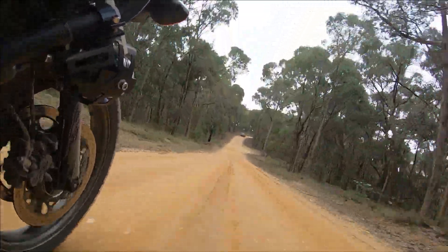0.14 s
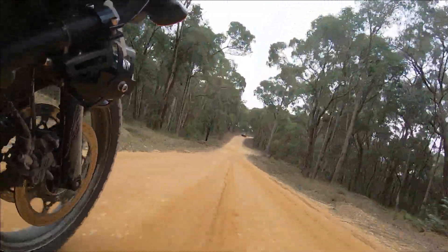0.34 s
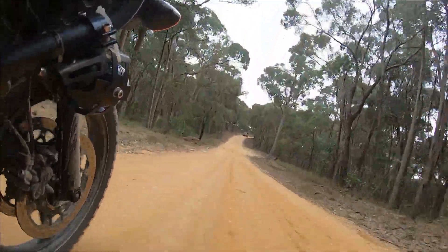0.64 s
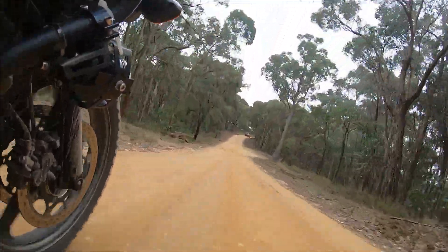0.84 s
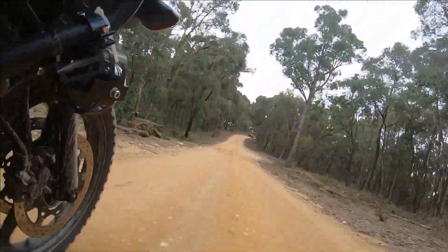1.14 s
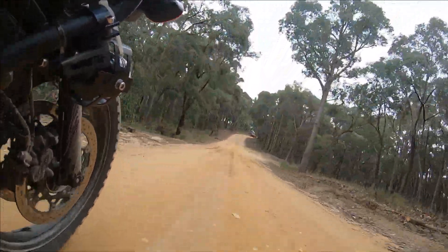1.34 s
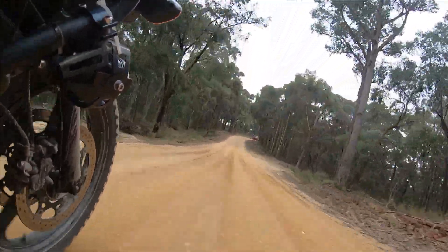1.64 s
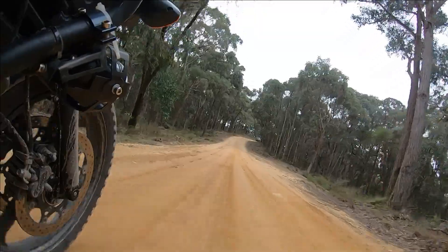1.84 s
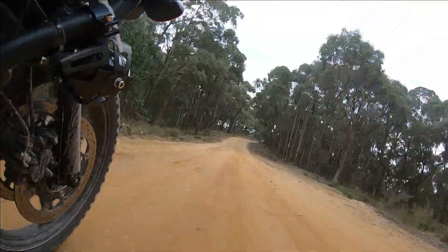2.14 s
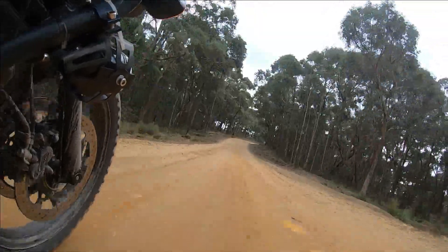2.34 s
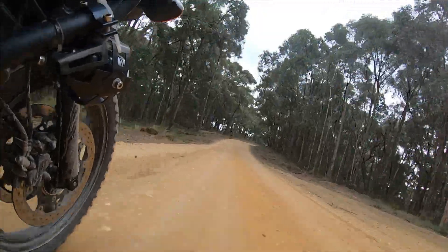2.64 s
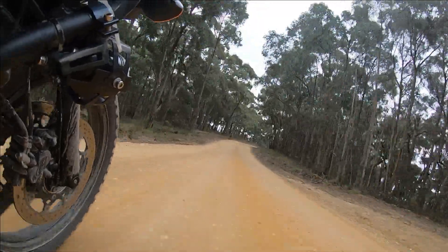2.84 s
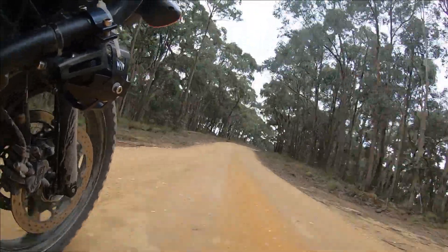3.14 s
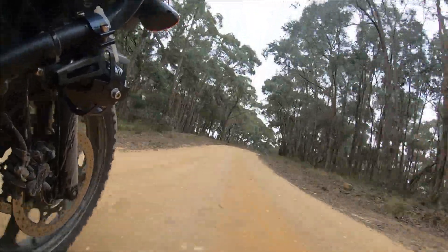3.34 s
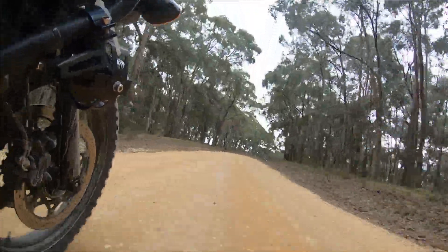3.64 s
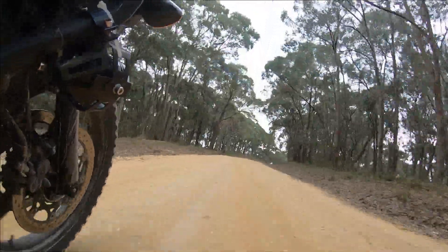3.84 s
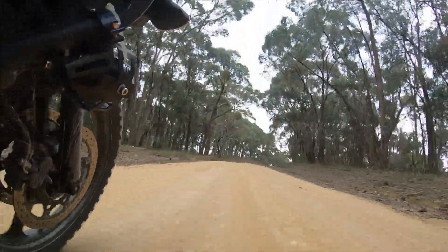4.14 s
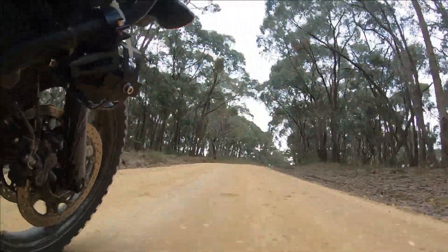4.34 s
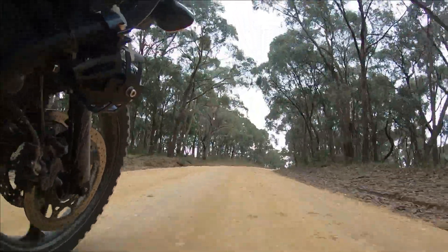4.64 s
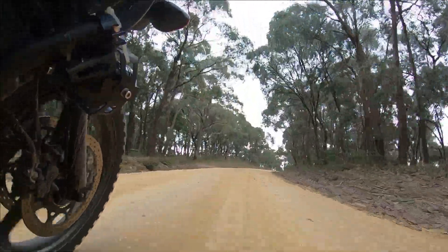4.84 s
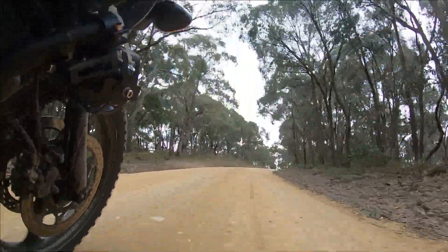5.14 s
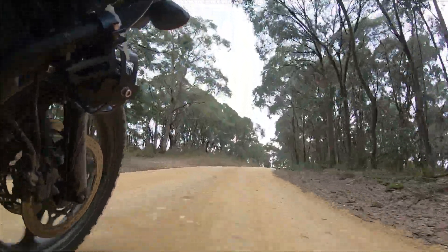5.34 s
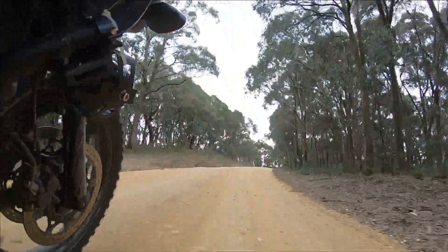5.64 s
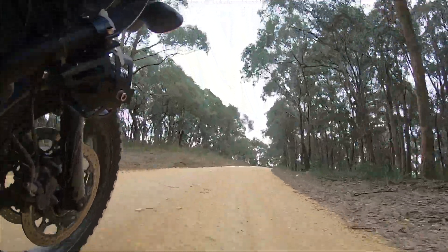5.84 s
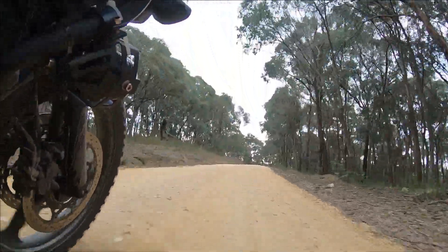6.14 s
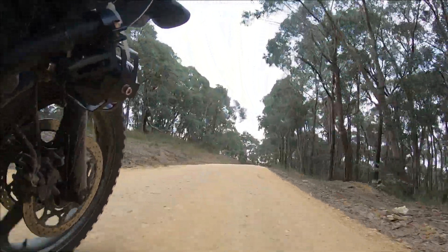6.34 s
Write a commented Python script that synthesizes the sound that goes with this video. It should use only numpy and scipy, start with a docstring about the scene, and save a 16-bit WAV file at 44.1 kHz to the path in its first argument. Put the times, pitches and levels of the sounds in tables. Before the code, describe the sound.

Low wind rumble and gritty tyre hiss surround a motorcycle coasting on a dirt road, with the microphone near the front wheel. Its twin-cylinder drone and gear whine slide down in pitch for about five seconds over a mechanical rattle. One flung stone clicks on metal. Near the end the engine takes up load again, growling and knocking at low, fairly steady revs.

```python
"""Gravel road, low beside the front wheel of a rolling twin-cylinder motorcycle.
Wind buffets the microphone, the tyre hisses over grit, and one stone ticks against a guard.
Valves and chain clatter, gears whine through the case resonances, uneven firings drive the exhaust.
The revs sink on a closed throttle; from about 5.3 s the engine pulls again."""
import sys
import numpy as np
from scipy import signal
from scipy.fft import rfft, irfft, next_fast_len
from scipy.io import wavfile
from scipy.ndimage import uniform_filter1d, minimum_filter1d, map_coordinates

SR = 44100
rng = np.random.default_rng(int(sys.argv[2]) if len(sys.argv) > 2 else 0)


def to_wav(sig):
    """Store sig (one row per channel, or 1-D mono) as 16-bit WAV at the path in sys.argv[1].

    Samples outside -1..1 are clipped; the rate is SR.
    """
    pcm = np.clip(np.atleast_2d(sig), -1, 1) * 32767
    pcm = np.round(pcm).astype(np.int16)
    wavfile.write(sys.argv[1], SR, pcm.T)  # frames by channels


N = 286650

FIRING_CYCLES = (0, 3 / 8)
CRUISE_HZ, STRAIN_S = 40, 0.55
SILENCER_HZ, SILENCER_WIDTH_HZ = 161.5, 36
# gain laws: level/dB at CRUISE_HZ, dB per doubling of revs, dB added at full strain
WIND_LAW_DB, TYRE_LAW_DB, AIR_LAW_DB = (-18.5, 2.9, 1.5), (-38.5, 8, 6.4), (-69, 3, .8)
HEAD_LAW_DB, BARK_LAW_DB = (-29.5, 11.8, 8.4), (-27, 11.4, 3.5)

# four-stroke cycle rate: t/s, f/Hz
CYCLE_RATE = [(0.0, 49.1), (0.09, 48.3), (0.9, 46.6), (1.01, 47.0), (1.23, 45.5), (1.61, 45.6), (1.9, 44.0),
              (2.37, 43.4), (3.08, 41.0), (3.35, 39.5), (3.49, 39.3), (3.87, 38.0), (5.23, 32.4),
              (5.36, 33.8), (5.47, 32.5), (5.72, 33.0), (5.99, 32.7), (6.5, 33.4)]
# engine load: t/s, load (-1 braking, 0 slack, 1 pulling, more as the throttle snaps open)
ENGINE_LOAD = [(0, -.9), (4.95, -1), (5.14, 0), (5.33, 0), (5.37, 2.1), (5.41, 1.8), (5.46, .9), (6.5, 1)]
# spectral shapes: f/Hz, relative level/dB
WIND_SHAPE = [(10, -11.5), (25, -10), (36, -9), (52, 1.5), (70, -4), (110, -6.5), (200, -15.5), (400, -23),
              (900, -43)]
TYRE_SHAPE = [(2120, -28), (3600, -4), (4090, -0.5), (4460, 2.5), (4790, -0.5), (5040, 0.5), (5560, -8),
              (7850, -13), (9270, -24), (12100, -45.5), (20400, -120)]
AIR_SHAPE = [(8000, -14.5), (10000, -11.5), (11500, 4.5), (12400, 0), (13500, -17), (15000, -17)]
CRACK_SHAPE = [(1500, -17), (3000, 4), (5000, 5), (8000, 3), (9300, -23), (10000, -32), (15000, -38)]
CRANKCASE_SHAPE = [(320, -36.5), (550, -8.5), (807, -3), (929, 1), (1090, -2.5), (1190, -0.5), (1380, -3.5),
                   (1540, -2), (1900, -16.5), (2470, -19.5), (4180, -120)]
HEAD_SHAPE = [(1060, -36), (1800, -0.5), (3270, -6.5), (3900, -16), (5070, -43), (8580, -120)]
AIRBOX_SHAPE = [(90, -32), (135, 5), (165, 6.5), (228, 4.5), (265, -9), (360, -19), (500, -33)]
PIPE_SHAPE = [(110, -38.5), (170, 1.5), (240, -2.5), (320, 2), (420, -2), (600, -3), (800, -9), (1300, -24)]
BOOM_SHAPE = [(66, -7.5), (82, -6.5), (96, -2.5), (115, 0.5), (130, 0), (141, -5.5), (158, -8), (175, -2.5),
              (212, -2.5), (255, -13.5), (290, -11)]
# stone strike: t/s, gain/dB
STONE_HITS = [(4.7330, -12.5)]
# guard modes: f/Hz, relative level/dB, t60/s
GUARD_MODES = [(3000, -1.5, 0.016), (3660, 1, 0.0099), (5500, -12, .005), (7470, -1, 0.0064),
               (8100, -14, 0.0046)]
# crankcase clatter envelope: t/s, level/dB
CLATTER_ENVELOPE = [(0.0, -20.5), (1.2, -21.5), (1.5, -20), (2.0, -24.5), (2.4, -20.5), (3.35, -24.8),
                    (3.65, -22), (4.4, -26.5), (5.2, -25.5), (5.6, -24), (6.0, -23.5), (6.5, -21.5)]
# resonances of the loaded engine metal and of the cases: f/Hz, width/Hz, relative level/dB
KNOCK_MODES = [(920, 380, 4.5), (2270, 260, 2), (3244, 1060, -4), (4730, 120, -11), (5140, 110, -5.5)]
CASE_MODES = [(252, 51, -29), (338, 60, -35.5), (477, 45, -42.5), (588, 22, -38.5), (751, 64, -28.5),
              (940, 92, -36), (1180, 65, -39.5), (1582, 180, -32.5), (2124, 140, -34.5)]
# gear and chain tones: order (multiple of the cycle rate), relative level/dB
COAST_ORDERS = [(7, 0.5), (8, -3.5), (9, -6.5), (10, -2), (12, -0.5), (13, 4), (14, -3), (16, -1), (23, 2),
                (28, 1.5), (34, 1), (35, 0), (36, 1), (39, -2), (41, -1.5), (58, -1.5)]
DRIVE_ORDERS = [(7, -3.5), (11, -2.5), (20, 2), (22, -4.5), (28, 0), (35, 0), (48, -3.5), (65, -4),
                (68, -1)]
# strong exhaust tones ahead of BOOM_SHAPE: order, braking level/dB, slack level/dB, pulling level/dB
BOOM_ORDERS = [(2, -15.5, -13.5, -18), (3, -14.5, -16.5, -19.5), (4, -22, -27, -27), (5, -35.5, -28, -27),
               (6, -20.5, -29.5, -17.5)]


def amp(db):
    """Decibels to gain."""
    return 10 ** (np.asarray(db) / 20)


def unit(x):
    """Scale to rms 1."""
    return x / np.sqrt(np.mean(x ** 2) + 1e-20)


def curve(rows):
    """(t/s, value) rows interpolated per sample."""
    return np.interp(np.arange(N) / SR, *np.transpose(rows))


def wobble(rate_hz):
    """Smooth random curve, rate_hz knots a second."""
    return map_coordinates(rng.standard_normal(8192), [np.arange(N) * rate_hz / SR + 2], mode="wrap")


def coloured(x, shape, size=16384):
    """x through a minimum-phase filter of (f/Hz, level/dB) shape, at rms 1."""
    hz, db = np.transpose(shape)
    bins_hz = np.fft.rfftfreq(size, 1 / SR)
    gain = amp(np.interp(np.log(bins_hz + 1), np.log(hz), db, right=-100))
    cepstrum = irfft(np.log(np.maximum(gain, 1e-6)))
    cepstrum[1:size // 2] *= 2
    cepstrum[size // 2 + 1:] = 0
    impulse_response = irfft(np.exp(rfft(cepstrum)))
    return unit(signal.fftconvolve(x, impulse_response)[:N])


def resonant(x, modes):
    """x through resonances of heavy metal that passes no top treble, at rms 1."""
    size = next_fast_len(N + SR // 4)
    f = np.fft.rfftfreq(size, 1 / SR)
    rings = sum(amp(db) * (1j * f * width_hz / (hz * hz - f * f + 1j * f * width_hz)) ** 2
                for hz, width_hz, db in modes)
    response = rings / (1 + (f / 7500) ** 10)
    return unit(irfft(rfft(x, size) * response, size)[:N])


def pulses(cycle, at_cycles, scatter_db, jitter_s):
    """Uneven impulses at given points of every engine cycle."""
    marks = (np.arange(int(cycle[-1]) + 1)[:, None] + np.asarray(at_cycles)).ravel()
    timing, size = rng.standard_normal((8192, 2))[:len(marks)].T
    at_samples = np.interp(marks, cycle, np.arange(N), right=2 * N) + jitter_s * SR * timing
    return unit(np.bincount(np.abs(at_samples).astype(int), amp(scatter_db * size), minlength=N)[:N])


def puffs(cycle, at_cycles, sharpness):
    """Noise swelling at given points of every engine cycle."""
    gate = sum(np.exp(sharpness * (np.cos(2 * np.pi * (cycle - at)) - 1)) for at in at_cycles)
    return unit(gate * rng.standard_normal(N))


def hiss(patchy_db):
    """Noise with drifting patches of gain."""
    spectra = signal.stft(rng.standard_normal(N), nperseg=1024)[2]
    patches = uniform_filter1d(rng.standard_normal(spectra.shape), size=5, axis=0)
    patches = uniform_filter1d(patches, size=12, axis=1)
    return unit(signal.istft(spectra * amp(patchy_db * unit(patches)), nperseg=1024)[1][:N])


def loudness(law_db, pull):
    """Gain rising with revs and with the strain that builds as the engine pulls."""
    cruise_db, revs_db, strain_db = law_db
    pole = np.exp(-1 / (STRAIN_S * SR))
    strain = signal.lfilter([1 - pole], [1, -pole], pull)
    return amp(cruise_db + revs_db * np.log2(curve(CYCLE_RATE) / CRUISE_HZ) + strain_db * strain)


def wind(pull):
    """Eddies thump on the microphone, gusting at random."""
    gust_db = 0.6 * wobble(rate_hz=4)
    return loudness(WIND_LAW_DB, pull) * amp(gust_db) * coloured(rng.standard_normal(N), WIND_SHAPE)


def tyre(cycle, pull):
    """Tread hisses over grit, with thin metal rings; a faint airy hiss grows under load."""
    surface_db = 0.39 * wobble(24)
    grit = unit((rng.random(N) < 500 / SR) * rng.standard_normal(N))  # 500 grains/s
    tread = hiss(patchy_db=1.3) + .35 * grit + .3 * puffs(cycle, FIRING_CYCLES, sharpness=11)
    rush = amp(0.6) * coloured(tread, TYRE_SHAPE)
    ring = amp(-11.5) * resonant(rng.standard_normal(N), [(4680, 120, 2.2), (6300, 48, -1.7)])
    air_gain = loudness(AIR_LAW_DB, pull) * amp(3.3 * np.minimum(pull, 1) + 1.5 * surface_db)
    air = air_gain * coloured(hiss(patchy_db=1.0) + .3 * grit, AIR_SHAPE)
    return loudness(TYRE_LAW_DB, pull) * amp(surface_db) * (rush + ring) + air


def stone():
    """A flung stone cracks against a guard, which rings for milliseconds."""
    out, t = np.zeros(N + SR), np.arange(SR // 20) / SR
    attack = 1 - np.exp(-(t / .00025) ** 2)
    ring = sum(amp(db - 60 * t / t60_s) * np.sin(2 * np.pi * hz * t) for hz, db, t60_s in GUARD_MODES)
    for start_s, gain_db in STONE_HITS:
        noise = coloured(rng.standard_normal(N), CRACK_SHAPE)[SR:][:len(t)]
        crack = 0.62 * amp(-60 * t / 0.01) * noise
        out[round(start_s * SR):][:len(t)] += amp(gain_db) * (ring + crack) * attack
    return out[:N]


def clatter(cycle, pull):
    """Valves and chain rattle cases and heads at 8 points a cycle; the metal knocks under load."""
    contacts = (np.arange(8) + rng.uniform(-.3, .3, size=8)) / 8
    rattle = .5 * pulses(cycle, contacts, scatter_db=2, jitter_s=.00008) + hiss(patchy_db=0.4)
    case_db = curve(CLATTER_ENVELOPE) + 0.48 + 0.31 * wobble(16)
    case = amp(case_db) * coloured(rattle, CRANKCASE_SHAPE)
    taps = 0.48 * pulses(cycle, contacts, scatter_db=0.5, jitter_s=.00004)
    taps += 0.13 * puffs(cycle, FIRING_CYCLES, sharpness=20) + hiss(patchy_db=1.13)
    head = loudness(HEAD_LAW_DB, pull) * amp(0.4 * wobble(22)) * coloured(taps, HEAD_SHAPE)
    knock = resonant(puffs(cycle, FIRING_CYCLES, sharpness=1.5), KNOCK_MODES)
    return case + head + np.minimum(pull, 1) * amp(-29.5) * knock


def gear_whine(cycle, orders):
    """Gear and chain tones swell as they slide through the case resonances."""
    hop = 100
    rate_hz = curve(CYCLE_RATE)[::hop]
    out = 0
    for order, tone_db in orders:
        power = sum(amp(db) ** 2 / (1 + ((order * rate_hz - hz) / (width_hz / 2)) ** 2) ** 1.5
                    for hz, width_hz, db in CASE_MODES)
        case_gain = np.repeat(np.sqrt(2 * power), hop)[:N]
        backlash_cycles = .0038 * wobble(70)  # tooth play blurs high tones most
        out += amp(tone_db) * case_gain * np.sin(2 * np.pi * order * (cycle + backlash_cycles))
    return out


def exhaust(cycle, load, pull):
    """Two unevenly spaced firings: booming low orders and a bark in the pipe."""
    rate_hz = curve(CYCLE_RATE)
    flutter_db = .5 + 0.7 * pull
    boom = 0
    for order, *load_db in BOOM_ORDERS:
        hz = order * rate_hz
        db = np.interp(load, [-1, 0, 1], load_db) + np.interp(hz, *np.transpose(BOOM_SHAPE))
        # silencer lags above resonance: smooth drone at speed, separate thuds at low revs
        lag_rad = 2 * np.arctan(2 * (hz - SILENCER_HZ) / SILENCER_WIDTH_HZ)
        boom -= np.sqrt(2) * amp(db + flutter_db * wobble(25)) * np.cos(2 * np.pi * order * cycle - lag_rad)
    blows = pulses(cycle, FIRING_CYCLES, scatter_db=0.5, jitter_s=0.00018)
    blows += 1.58 * puffs(cycle, FIRING_CYCLES, sharpness=0.52)
    return boom + loudness(BARK_LAW_DB, pull) * coloured(blows, PIPE_SHAPE)


def intake(cycle, pull):
    """Gulps of air make the airbox growl under load."""
    gulps = pulses(cycle, FIRING_CYCLES, scatter_db=2.5, jitter_s=.0003)
    flow = 3.5 * puffs(cycle, FIRING_CYCLES, sharpness=1.0) - gulps
    return pull * amp(-25.0) * coloured(flow, AIRBOX_SHAPE)


def scene():
    """Wind, a stone and the bike, whose rhythms follow the engine cycle; mono."""
    cycle = np.cumsum(curve(CYCLE_RATE)) / SR
    load = curve(ENGINE_LOAD)
    coast, pull = np.clip(-load, 0, 1), np.maximum(load, 0)
    engine = exhaust(cycle, load, pull) + intake(cycle, pull)
    # load decides which teeth touch
    gears = coast * gear_whine(cycle, COAST_ORDERS)
    gears += np.minimum(pull, 1) * gear_whine(cycle, DRIVE_ORDERS)
    bike = engine + gears + clatter(cycle, pull) + tyre(cycle, pull)
    return (bike + wind(pull) + stone())[None]


def record(dry):
    """Peak limiter, then a steep low-pass."""
    ceiling_db, cutoff_hz = -4.0, 15100
    needed = np.minimum(1, amp(ceiling_db) / (np.abs(dry[0]) + 1e-9))
    gain = uniform_filter1d(minimum_filter1d(needed, size=500), size=400)
    lowpass = signal.butter(24, cutoff_hz, fs=SR, output="sos")
    return signal.sosfilt(lowpass, dry * gain)


dry = scene()
out = record(dry)
to_wav(out)
```